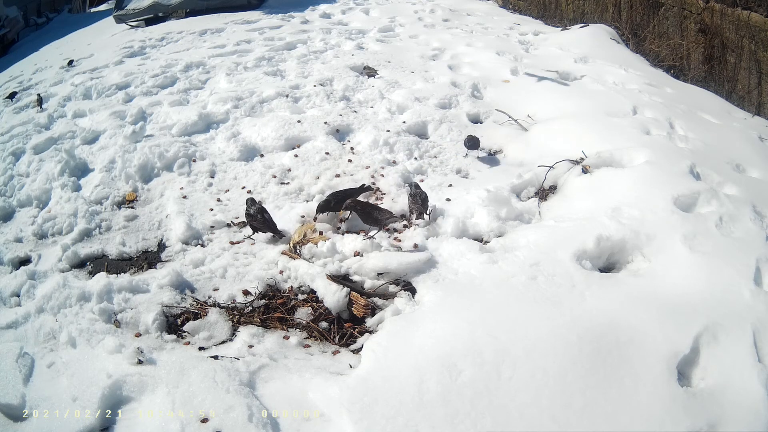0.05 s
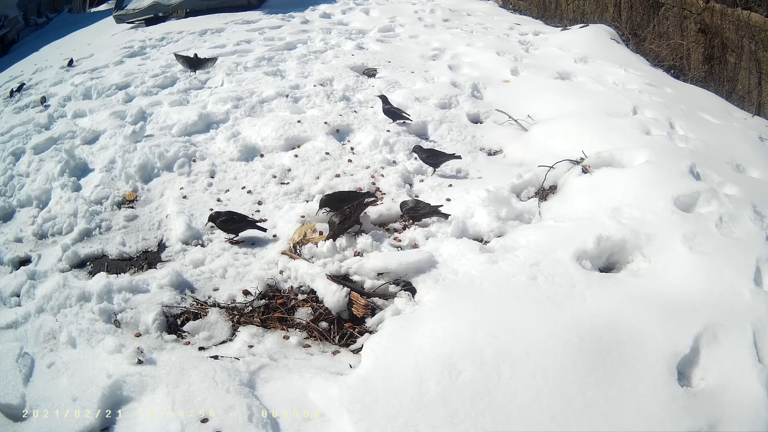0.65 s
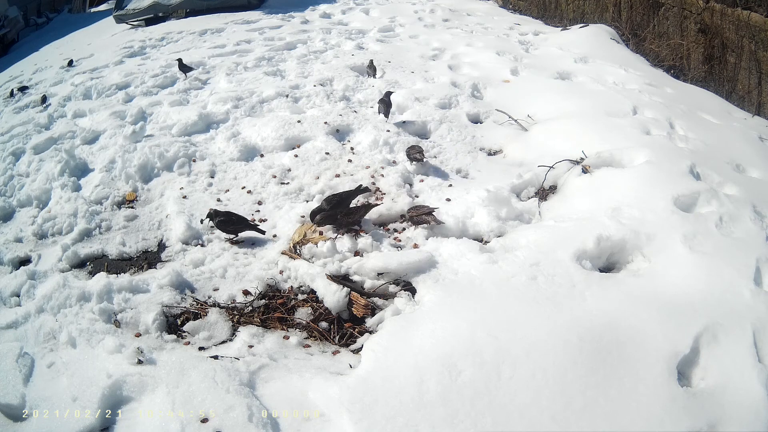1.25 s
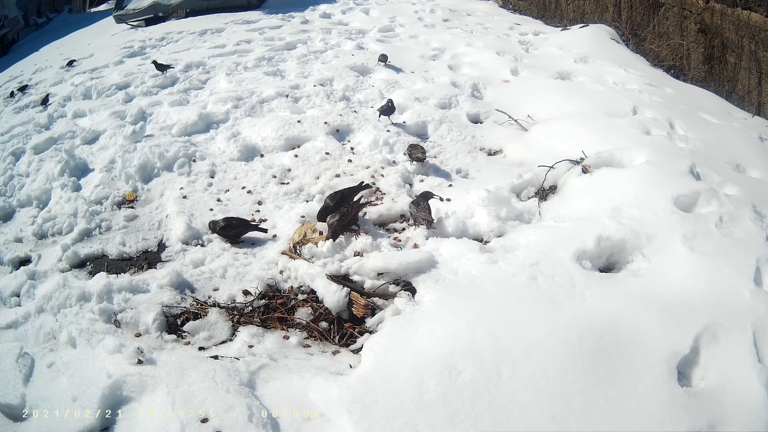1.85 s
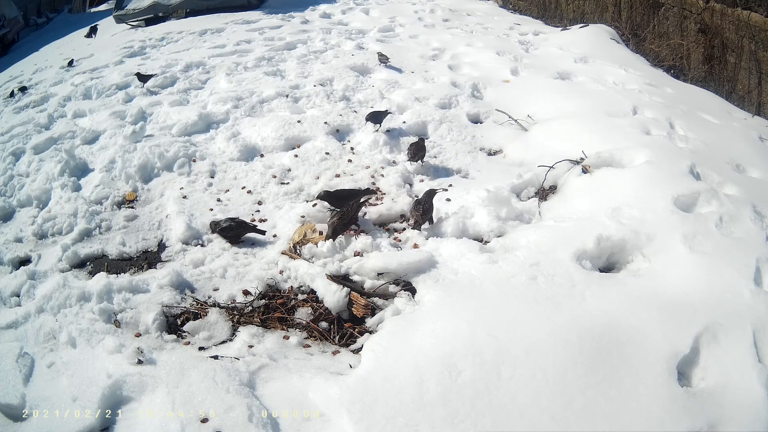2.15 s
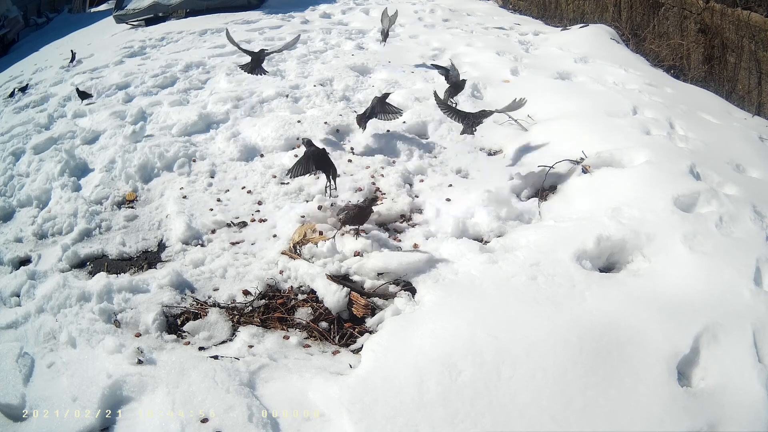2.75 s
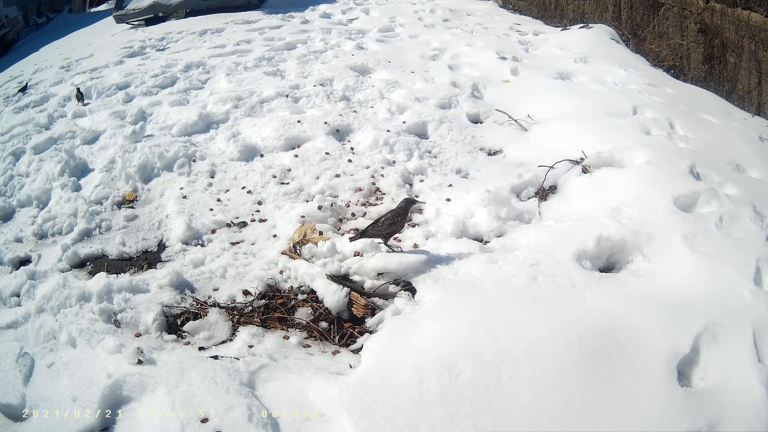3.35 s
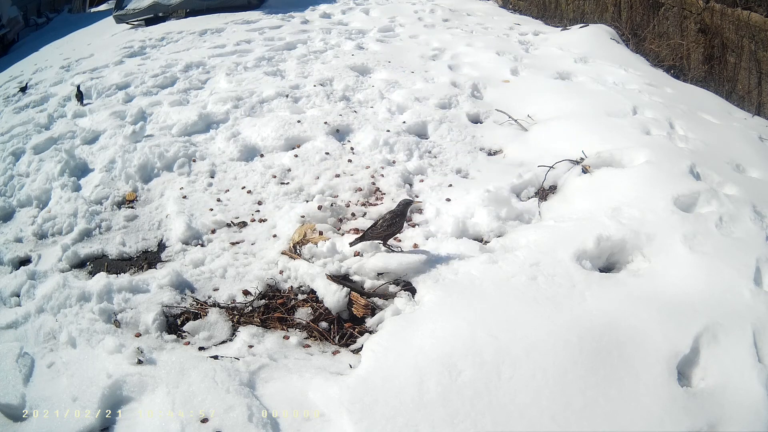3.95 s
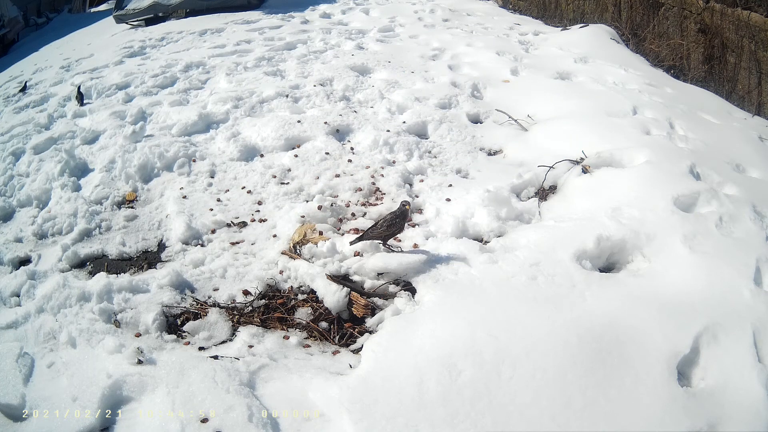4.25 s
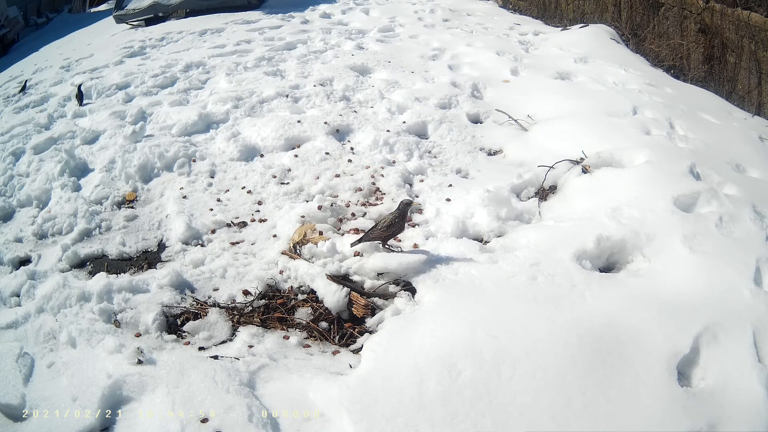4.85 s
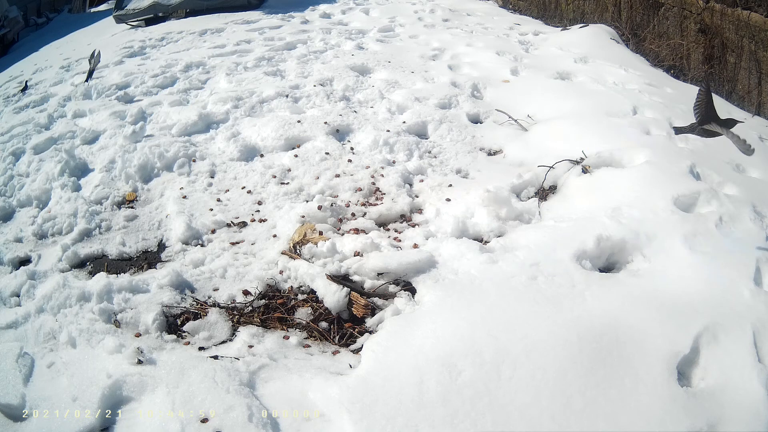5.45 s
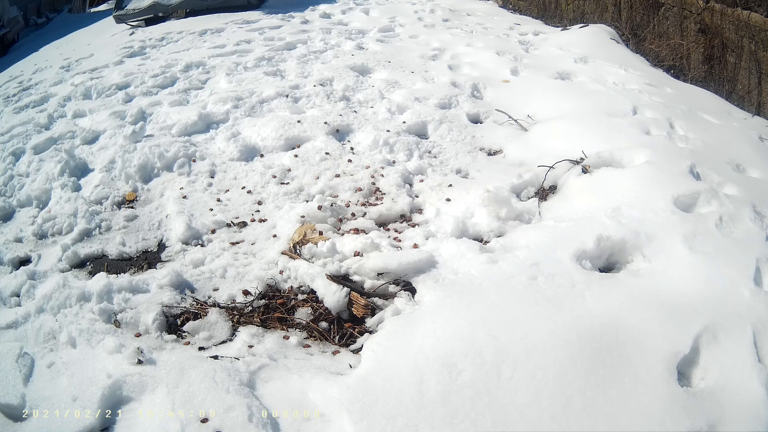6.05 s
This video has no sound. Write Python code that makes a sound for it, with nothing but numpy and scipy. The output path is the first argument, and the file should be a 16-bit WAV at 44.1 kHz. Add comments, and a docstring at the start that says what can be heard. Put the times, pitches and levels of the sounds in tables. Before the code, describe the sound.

A small flock of starlings pecks and scuffles softly at seed on crusted snow. Suddenly they burst into the air close to the microphone with a clatter of wings and two harsh, trilling squawks. A lull follows, with faint chirps from distant birds and a light breeze. Then one remaining bird leaves with a quick run of wingbeats that fades away.

```python
"""A small flock of starlings squawks twice and bursts off crusted snow in a clatter of wings.
Each squawk is a trill from the two sides of the syrinx; each downstroke swishes, rattles the
feathers and pushes a puff of air. Beforehand the birds peck and scuffle at seed, and the last
one leaves with a run of single wingbeats. Far birds chirp faintly in a light winter breeze."""
import sys
import numpy as np
from scipy import signal
from scipy.fft import rfft, irfft, next_fast_len
from scipy.io import wavfile

SR = 44100
rng = np.random.default_rng(int(sys.argv[2]) if len(sys.argv) > 2 else 0)


def wav_record(signal):
    """Record a signal, one row per channel, as 16-bit PCM in the file named by sys.argv[1]."""
    frames = np.transpose(np.atleast_2d(signal))
    bounded = np.clip(frames, -1, 1)
    # unit amplitude maps onto the largest positive 16-bit level
    quanta = np.round(bounded * 32767).astype(np.int16)
    wavfile.write(sys.argv[1], SR, quanta)


N = 268128
TIME = np.arange(N) / SR

# Noise spectra: (frequency [Hz], relative spectral density [dB])
HUSH_SPECTRUM = [(20, -6.5), (32, -4.5), (130, -16), (250, -13), (400, -17), (600, -17), (1200, -21),
                 (2300, -25.5), (3500, -29), (12000, -32), (15500, -35.5)]  # open air
DRAUGHT_SPECTRUM = [(15, -1.5), (36, -7.5), (50, 6.5), (64, -5.5), (120, -2), (200, -14.5), (400, -27.5),
                    (1000, -39.5)]  # low rumble of moving air
CRUST_SPECTRUM = [(400, -1.5), (1500, -9), (4000, 0.5), (7000, -2), (10500, 1), (12500, -8.5), (15500, -19)]  # brushed snow and grit
SNAP_SPECTRUM = [(500, -16), (2000, -6), (4000, 3), (9500, 0), (11500, -3.5), (13000, -16), (15500, -27)]  # hard contact
SWISH_SPECTRUM = [(100, 0), (250, -2.5), (500, 3), (1100, 3), (2200, 0), (4000, -9.5), (7000, -11.5),
                  (14000, -37.5)]  # sweeping wing
FEATHER_SPECTRUM = [(300, -10), (1500, -4.5), (3500, -0.5), (6500, -2.5), (9800, 1.5), (11500, -2),
                    (13500, -10), (15500, -24)]  # slipping barbs
PUSH_SPECTRUM = [(25, -22), (60, 4), (110, 3), (250, 1), (450, -13), (1200, -45)]  # air displaced by a downstroke

# Slow swell of the breeze: (time [s], level [dB])
BREEZE_LEVELS = [(0, -62.5), (.6, -64), (1.6, -65.5), (2.4, -61), (3.6, -60), (4.4, -64), (4.8, -66),
                 (6.08, -62.5)]
# Puffs of air: (time [s], level [dB], length [s])
PUFFS = [(1.915, -55.5, 0.41), (2.7, -40, .22), (3.127, -49.5, 0.106), (3.54, -48.5, 0.139),
         (3.9, -66.5, 0.51), (4.393, -54.5, 0.121)]
# Far calls: (time [s], length [s], relative level [dB], start pitch [Hz], end pitch [Hz],
# roughness [0-1])
FAR_CHIRPS = [(0.044, 0.091, -63, 1600, 2293, 0.23), (3.783, 0.152, -68, 2610, 2216, 0.84),
              (4.0, 0.05, -69, 4400, 4760, 0.3), (4.017, 0.091, -68.5, 3780, 3724, 0.31),
              (4.226, 0.0305, -70.5, 4760, 4770, 0.29), (4.217, .22, -73, 2274, 2516, 0.47),
              (4.939, 0.135, -76, 2201, 2348, 0.27), (6.023, .06, -77.5, 3900, 3700, .3)]
# Feet and wings on snow: (time [s], relative hiss [dB], relative swish [dB], length [s])
SNOW_BRUSHES = [(0.178, -61.5, -67, 0.0884), (0.271, -56, -65, 0.0455), (0.326, -67.5, -64, 0.08),
                (0.427, -54, -73, 0.023), (0.435, -61, -66, 0.087), (0.54, -56, -63, 0.047),
                (.674, -59, -79.5, 0.0243), (0.762, -61, -60, 0.0435), (.807, -55.5, -64.5, 0.0129),
                (0.929, -58.5, -73, 0.056), (1.13, -60.5, -69, 0.0564), (1.39, -64.5, -68.5, 0.0475),
                (1.804, -58.5, -69, 0.106), (1.981, -56.5, -61, 0.0154), (2.027, -54.5, -61.5, 0.0748),
                (2.106, -55.5, -61.5, 0.0437), (2.416, -49.5, -76, 0.059), (3.571, -52.5, -56, 0.0135),
                (5.123, -53, -73, 0.0387)]
# Beaks on seed, kicked grit and clacking quills:
# (time [s], relative level [dB], ring frequency [Hz], time constant [s], share of snap [0-1])
IMPACTS = [(.547, -40.5, 9220, 0.0007, 0.55), (.856, -44, 1810, 0.00037, 0.54),
           (1.1983, -43.5, 3460, 0.00078, 0.48), (1.459, -47.5, 2400, 0.000243, 0.15),
           (1.609, -45, 2790, 0.000294, .36), (1.957, -22, 4640, .00026, .45),
           (2.037, -33.5, 1710, 0.000207, 0.35), (2.257, -46.5, 9090, 0.00082, 0.39),
           (2.638, -23.5, 5730, 0.0011, 0.78), (2.7263, -23, 4190, 0.00069, 0.61),
           (2.844, -31.5, 3560, 0.00076, 0), (2.8493, -17, 6405, 0.000274, 0.59),
           (2.911, -22, 7000, 0.000143, 0.82), (3.387, -45, 2550, 0.00066, 0.63),
           (3.636, -36, 2320, 0.000366, 0.5), (3.695, -51, 4570, 0.00089, 0.96)]
# Flurries of many wings: (time [s], rise [s], hold [s], time to recede to half amplitude [s],
# feather hiss [dB], swish [dB], draught [dB])
WING_FLURRIES = [(0.044, 0.317, .2, .04, -74.5, -72, -60), (2.475, 0.181, 0.2453, 0.025, -42, -45.5, -47),
                 (2.936, 0.1044, 0.1328, .04, -49, -50, -45),
                 (5.14, 0.1364, 0.2263, 0.0276, -53.5, -60, -51)]
# Near wingbeats: (time [s], relative swish [dB], relative feather hiss [dB], lag of second wing [s])
DOWNSTROKES = [(2.514, -42, -61.5, 0.0085), (2.579, -44, -45, 0.0054), (2.635, -41, -38.5, 0.0036),
               (2.66, -40.5, -34.5, 0.01085), (2.695, -37, -35, 0.0112), (2.72, -35.5, -38, 0.00428),
               (2.747, -31, -35.5, 0.0099), (2.776, -39, -37.5, 0.0097), (2.809, -39, -42.5, 0.0054),
               (2.865, -45.5, -54.5, 0.0105), (2.924, -44.5, -48, 0.0071), (5.197, -53.5, -51.5, 0.0124),
               (5.246, -38, -44.5, 0.00704), (5.298, -41, -45, 0.01105), (5.355, -42, -45.5, 0.00896),
               (5.412, -41.5, -40.5, 0.01238), (5.469, -47, -46, 0.0147), (5.528, -54, -51.5, 0.0051),
               (5.599, -66.5, -60.5, 0.009), (5.654, -57, -57.5, 0.0094)]
# Response of the throat and open beak: (frequency [Hz], gain [dB])
THROAT_RESPONSE = [(900, -13), (1700, -6.5), (2200, -4), (2600, -0.5), (3100, -5), (3700, -4.5), (4400, -3),
                   (5300, -22), (8000, -13), (14000, -27.5)]
# Course of each squawk:
# (time [s], relative level [dB], foot pitch [Hz], mean upward flick [Hz], second voice gain [dB])
SQUAWK_CONTOURS = [
    [(2.465, -51.5, 2598, 300, -12), (2.477, -55, 2406, 450, -12), (2.481, -36, 2300, 446.7, -7),
     (2.53, -29.5, 2480, 624.3, -5.5), (2.572, -25.5, 2540, 704, 2), (2.583, -39.5, 2400, 1107, 10),
     (2.62, -30.5, 2504, 1643, -11), (2.66, -31.5, 2590, 1741, -12.5), (2.717, -32, 2583, 1428, -13)],
    [(2.968, -49, 2220, 301.8, 4.5), (3.02, -43, 2102, 447.3, -0.5), (3.07, -35.5, 2127, 397.7, 3.5),
     (3.125, -39, 2205, 345.5, 3.5), (3.15, -38.5, 2298, 150, -6), (3.166, -59, 2400, 152, -7)],
]
# Trill of each squawk: (time of first flick [s], pace [factor])
SQUAWK_TRILLS = [(2.483, 1), (2.973, .94)]
# Timbre of each squawk: (roughness [0-1], dip at each flick [dB], second voice pitch [Hz],
# its sag between flicks [0-1], relative breath hiss [dB])
SQUAWK_TIMBRES = [(.13, -9, 2233, .36, -13.5), (.2, -17, 2925, .04, -2.5)]


def amp(db):
    """Converts decibels to an amplitude ratio."""
    return 10 ** (np.asarray(db) / 20)


def unit(x):
    """Normalises to rms 1."""
    return x / np.sqrt(np.mean(x ** 2) + 1e-20)


def add(mix, start_s, sound):
    """Superposition: adds a sound to the mix from the given time."""
    part = mix[max(round(start_s * SR), 0):][:len(sound)]
    part += sound[:len(part)]


def colour(x, spectrum):
    """Linear filtering by a table of (frequency [Hz], gain [dB])."""
    hz, db = np.transpose(spectrum)
    size = next_fast_len(len(x) + 2048)
    f = np.fft.rfftfreq(size, 1 / SR)
    gain = amp(np.interp(np.log(f + 1), np.log(hz), db))
    return irfft(rfft(x, size) * gain, size)[:len(x)]


def noise(spectrum):
    """Spectral shaping of white noise, at rms 1."""
    return unit(colour(rng.standard_normal(N), spectrum))


def wander(size, hz):
    """Random modulation: low-pass noise of rms 1 and a bandwidth of about hz."""
    f = np.fft.rfftfreq(size, 1 / SR)
    return unit(irfft(rfft(rng.standard_normal(size)) * np.exp(-(f / hz) ** 2), size))


def stroke(length, rise):
    """An envelope that peaks at the share rise of its length, then has a Gaussian decay."""
    u = np.arange(0, 2 * length, 1 / SR) / length
    decay = np.exp(-2 * ((u - rise) / (1 - rise)) ** 2)
    return np.where(u < rise, np.sin(np.pi / 2 * u / rise), decay)


def crackle(spectrum):
    """Friction noise: barbs or ice crystals slip in tiny clumps, giving a grainy hiss."""
    clumps = amp(2.6 * wander(N, 700))
    return unit(colour(rng.standard_normal(N) * clumps, spectrum))


def yard_echo(x, t60):
    """Reverberation: scattered reflections from fence and house fall by 60 dB in t60 seconds."""
    t = np.arange(SR // 2) / SR
    tail = rng.standard_normal(len(t)) * np.exp(-np.log(1000) * t / t60) * (t > .012)
    return signal.fftconvolve(x, tail / np.linalg.norm(tail))[:N]


def breeze(draught_over_hush_db=2):
    """Flow noise: a hush swells slowly with a low draught, to which puffs add in power."""
    hush = amp(np.interp(TIME, *np.transpose(BREEZE_LEVELS)))
    puffs = np.zeros(N)
    for start, db, length in PUFFS:
        add(puffs, start, amp(db) * stroke(length, rise=.432))
    draught = np.hypot(hush * amp(draught_over_hush_db), puffs)
    return hush * noise(HUSH_SPECTRUM) + draught * noise(DRAUGHT_SPECTRUM)


def far_birds(direct_db=-2, echo_db=-7, jitter_hz=700):
    """Frequency modulation: jitter roughens gliding whistles into rasps, which the yard smears."""
    calls = np.zeros(N)
    for start, length, db, start_hz, end_hz, rough in FAR_CHIRPS:
        size = round(length * SR)
        pitch = np.linspace(start_hz, end_hz, size) + jitter_hz * rough * wander(size, 700)
        whistle = np.sin(2 * np.pi * np.cumsum(pitch) / SR)
        add(calls, start, amp(db) * unit(whistle * signal.windows.tukey(size, .5)))
    return amp(direct_db) * calls + amp(echo_db) * yard_echo(calls, t60=.29)


def snow_scuffs(crust_db=-5, brush_db=-1.5, feeding_ends_s=2.2, scratches=35):
    """Stick-slip friction: feet and wings brush the crust; feeding adds a shuffle and tiny scratches."""
    hiss = amp(-69) * (TIME < feeding_ends_s)  # the shuffle of many small feet
    swish = np.zeros(N)
    for start, hiss_db, swish_db, length in SNOW_BRUSHES:
        add(hiss, start, amp(hiss_db) * stroke(length, rise=.405))
        add(swish, start, amp(swish_db) * stroke(length, rise=.524))
    for when, strength in rng.random((scratches, 2)):
        add(hiss, when * feeding_ends_s, amp(-63 + 6 * strength) * stroke(.0047, rise=.18))
    stick_slip = amp(1.5 * wander(N, 87.6))
    crust = amp(crust_db) * hiss * crackle(CRUST_SPECTRUM)
    brush = amp(brush_db) * swish * noise(SWISH_SPECTRUM)
    return stick_slip * (crust + brush)


def pecks_and_clacks(snap_db=-2.5):
    """Impact excitation: each hard contact gives a broadband snap and a heavily damped ring."""
    out = np.zeros(N)
    t = np.arange(1024) / SR
    for start, db, hz, tau, share in IMPACTS:
        contact = t / tau * np.exp(1 - t / tau)
        ring = contact * np.sin(2 * np.pi * hz * t)
        grit = colour(contact * rng.standard_normal(len(t)), SNAP_SPECTRUM)
        snap = unit(grit) * np.sqrt(np.mean(contact ** 2))
        add(out, start, amp(db) * ((1 - share) * ring + share * amp(snap_db) * snap))
    return out


def flock_wings(beat_hz=17, birds=3):
    """Incoherent summation: wings out of step add in power; amplitude falls inversely with distance."""
    hiss, swish, draught = np.zeros((3, N))
    for start, rise, hold, recede, hiss_db, swish_db, draught_db in WING_FLURRIES:
        distance = 1 + np.maximum(TIME - start - rise - hold, 0) / recede
        level = np.clip((TIME - start) / rise, 0, 1) / distance
        hiss = np.hypot(hiss, level * amp(hiss_db))
        swish = np.hypot(swish, level * amp(swish_db))
        draught = np.hypot(draught, level * amp(draught_db))
    power = np.full(N, 1.22)  # steady floor between beats
    for _ in range(birds):
        rate = beat_hz * (1 + .1052 * wander(N, 3.204))
        beats = np.cumsum(rate) / SR + rng.random()
        power += np.sin(np.pi * beats) ** 10
    flutter = unit(np.sqrt(power))
    wings = hiss * crackle(FEATHER_SPECTRUM) + swish * noise(SWISH_SPECTRUM)
    return flutter * wings + draught * noise(DRAUGHT_SPECTRUM)


def wingbeats(swish_gain_db=-3, hiss_gain_db=-2, wing_s=.01228, puff_s=.02473, usual_beat_db=-38.5):
    """Air displacement: two wings swish and rattle a moment apart and push a longer, low puff."""
    swish, hiss, push = np.zeros((3, N))
    for start, swish_db, hiss_db, lag in DOWNSTROKES:
        for onset, strength in (start - .001, 1), (start - .001 + lag, .794):
            add(swish, onset, strength * amp(swish_db + swish_gain_db) * stroke(wing_s, rise=.226))
            add(hiss, onset, strength * amp(hiss_db + hiss_gain_db) * stroke(wing_s, rise=.27))
        push_db = usual_beat_db + .6 * (swish_db - usual_beat_db)  # varies less than the swish
        add(push, start - .003, amp(push_db) * stroke(puff_s, rise=.276))
    wings = swish * noise(SWISH_SPECTRUM) + hiss * crackle(FEATHER_SPECTRUM)
    return wings + push * noise(PUSH_SPECTRUM)


def trill(age, pace, start_hz=87, end_hz=58, settle_s=.09):
    """Exponential relaxation: a train of flicks starts fast and slows; pace scales both rates."""
    head_start = (start_hz - end_hz) * settle_s * (1 - np.exp(-age / settle_s))
    cycles = pace * (end_hz * age + head_start)
    return np.abs(np.cos(np.pi * cycles)) ** 5.6


def squawk(contour, first_flick, pace, rough, dip_db, second_hz, sag, hiss_db, jitter_hz=560):
    """Source and filter: each side of the syrinx sounds a trilled voice, and the throat shapes both."""
    times, *columns = np.transpose(contour)
    t = np.arange(times[0], times[-1], 1 / SR)
    db, foot_hz, sweep_hz, second_db = (np.interp(t, times, column) for column in columns)
    flick = trill(t - first_flick, pace)
    reach = 1 + .1468 * wander(len(t), 65.1)  # no two flicks rise equally far
    pitch = foot_hz + sweep_hz * reach * flick + jitter_hz * rough * wander(len(t), 748)
    phase = 2 * np.pi * np.cumsum(pitch) / SR
    octave = (.188 + rough) * np.sin(2 * phase)  # stronger in a harsher voice
    first = (np.sin(phase) + octave) * amp(dip_db * flick)
    second_pitch = second_hz * (1 - sag * (1 - flick)) + jitter_hz * rough * wander(len(t), 612)
    second = amp(second_db) * flick ** .72 * np.sin(2 * np.pi * np.cumsum(second_pitch) / SR)
    shimmer = 1 + rough * wander(len(t), 430)
    breath = amp(hiss_db) * rng.standard_normal(len(t))
    voice = colour((first + second) * shimmer + breath, THROAT_RESPONSE)
    return times[0], amp(db) * np.sqrt(2) * voice * signal.windows.tukey(len(t), .02)


def scene():
    """Superposition of open air, feet, wings and calls; absorption by the snow leaves little echo."""
    background = breeze() + far_birds()
    starlings = pecks_and_clacks() + wingbeats() + flock_wings() + snow_scuffs()
    for contour, timing, timbre in zip(SQUAWK_CONTOURS, SQUAWK_TRILLS, SQUAWK_TIMBRES):
        add(starlings, *squawk(contour, *timing, *timbre))
    echo = amp(-21) * yard_echo(starlings, t60=.3)
    return (background + starlings + echo)[None]


def record(dry, cutoff_hz=15750):
    """Band limiting: a steep low-pass filter removes the highest treble."""
    low_pass = signal.firwin(511, cutoff_hz, window=("kaiser", 9), fs=SR)
    return signal.oaconvolve(dry, low_pass[None], "same")


dry = scene()
out = record(dry)
wav_record(out)
```